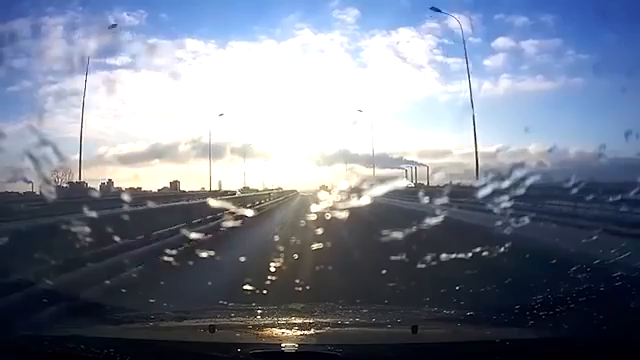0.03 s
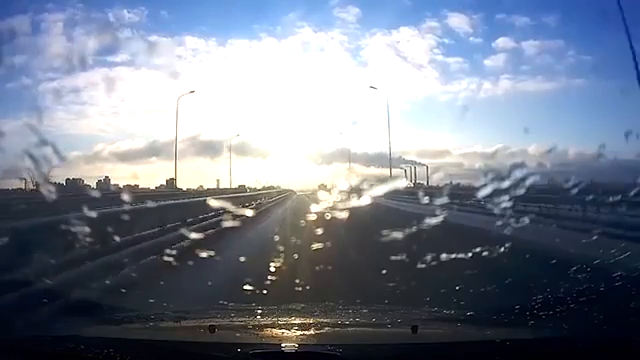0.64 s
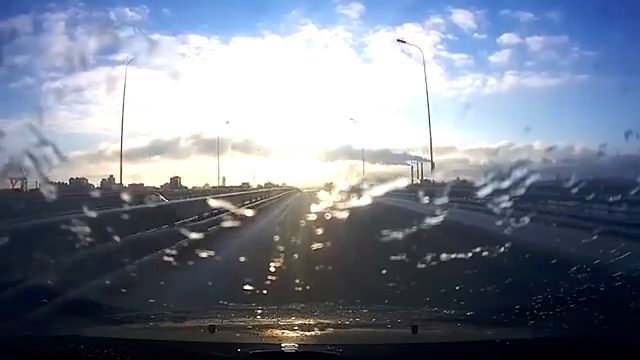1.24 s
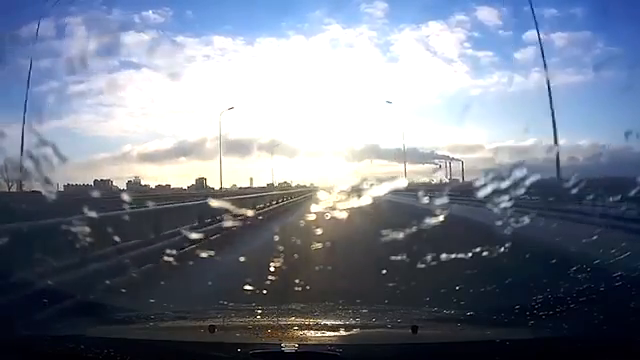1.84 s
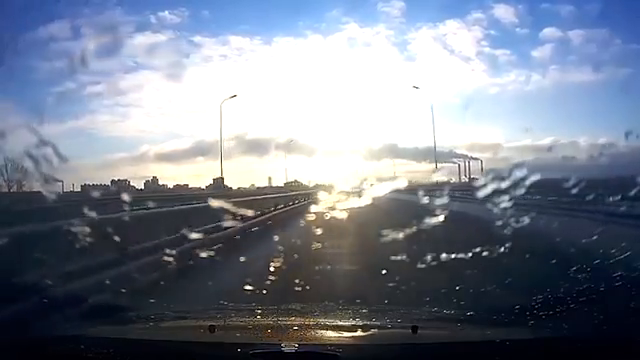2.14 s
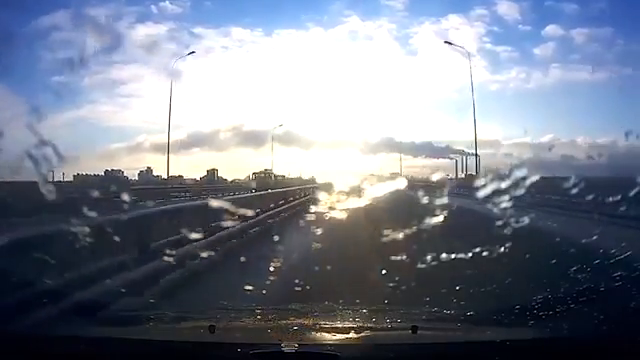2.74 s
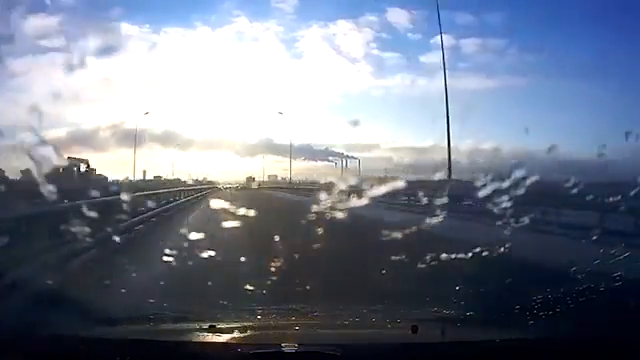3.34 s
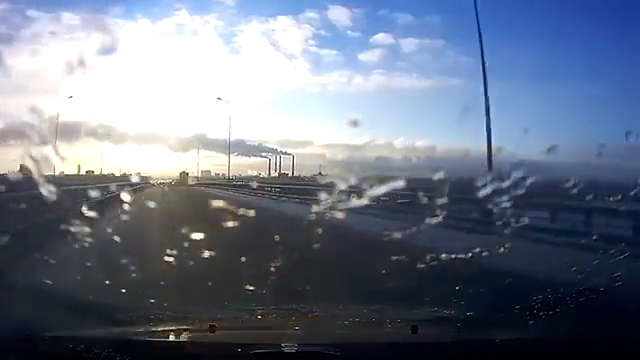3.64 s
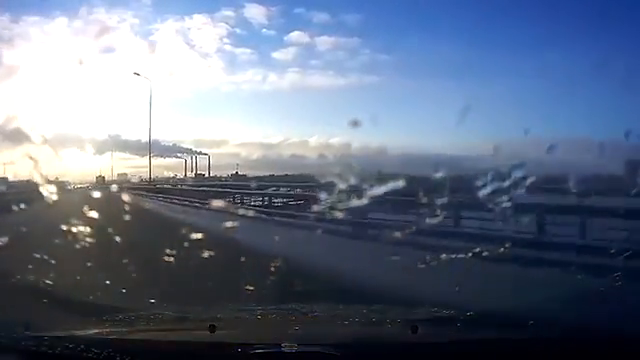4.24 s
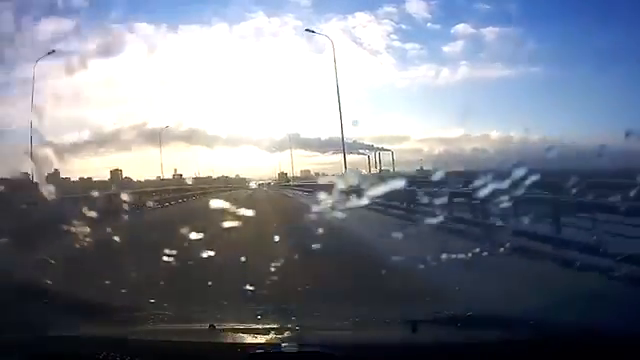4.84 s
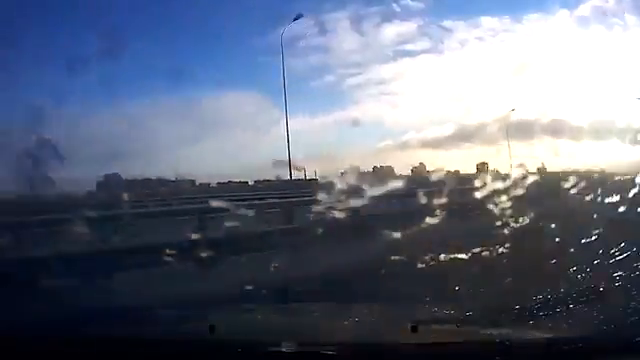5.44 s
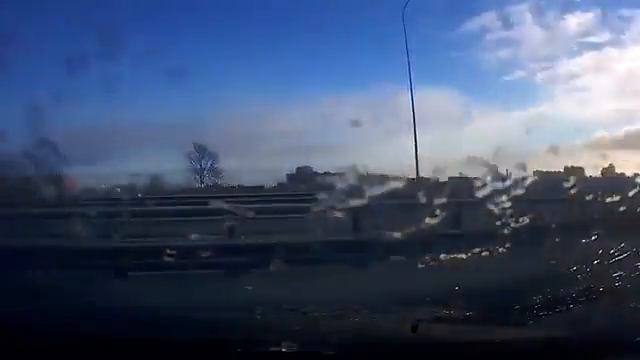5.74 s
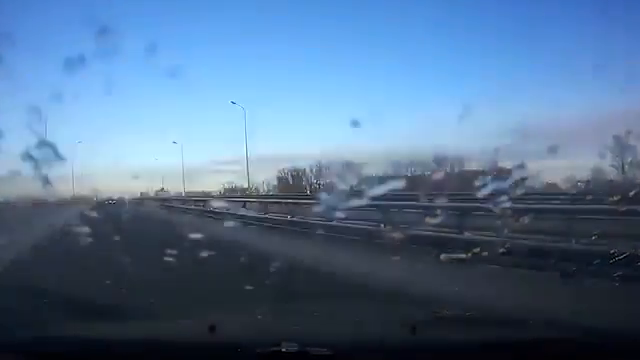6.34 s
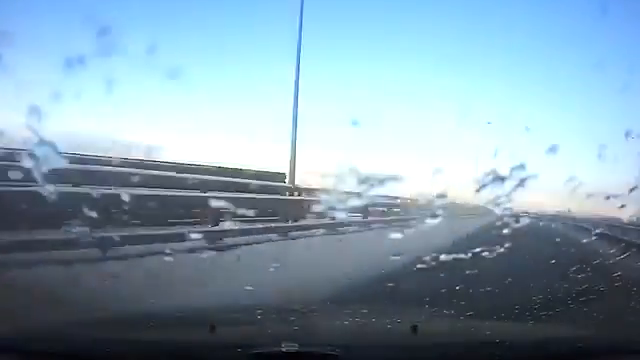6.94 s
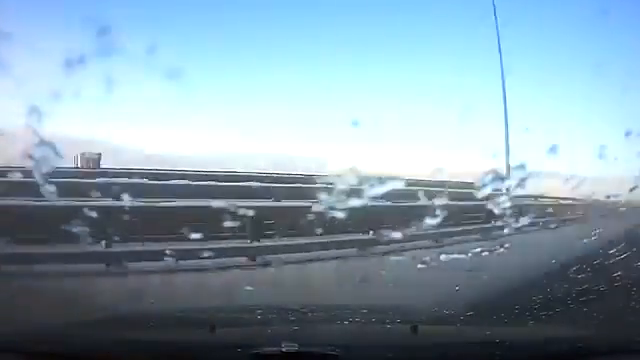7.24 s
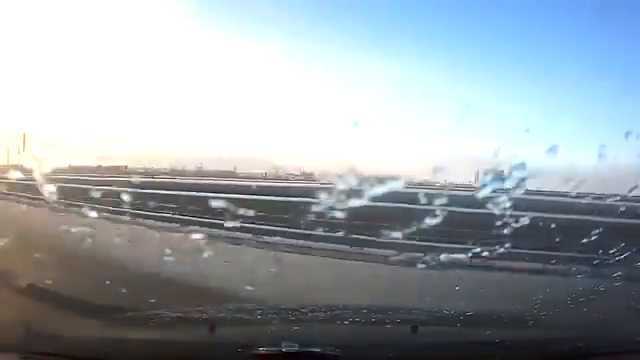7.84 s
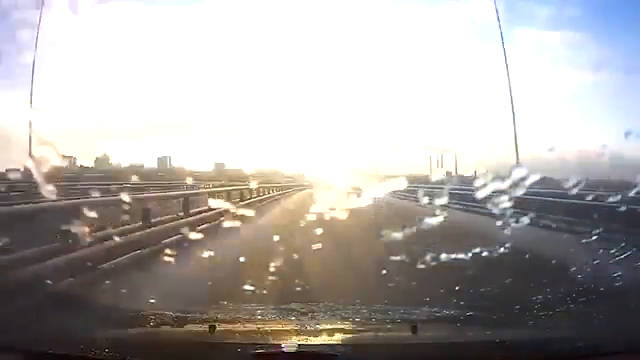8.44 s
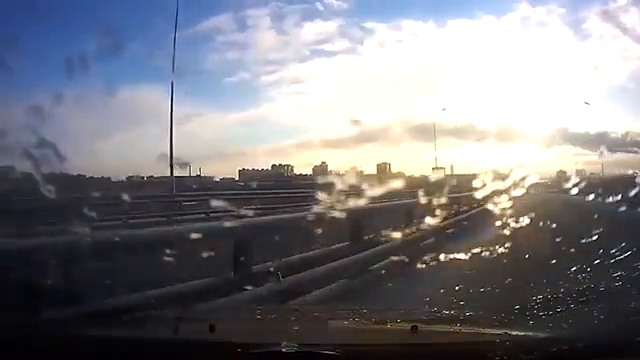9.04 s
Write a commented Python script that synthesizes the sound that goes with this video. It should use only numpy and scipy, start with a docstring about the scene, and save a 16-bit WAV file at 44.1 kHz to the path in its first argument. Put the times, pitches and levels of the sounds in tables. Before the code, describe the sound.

A small microphone at a car's windscreen picks up a throbbing low cabin boom, tyre roar and engine hum. Around 2 seconds the tyres lose grip on slush; the hum dips, returns briefly and is gone by 3.5. The rumble grows heavier and uneven, with plastic trim ticking, and a hard thud and clatter lands at 3.4. The tyres scrub sideways with small chirps from 4 to 4.6. A cluster of heavy knocks, jolts and splashing slush follows between 4.8 and 6, with a low growl near 5.8. A hoarse tyre howl swells to its loudest around 6.4. More thuds, sharp rattles and hissing spray come from 7 to 7.5, then another skid peaks near 7.9 with short squeals. A strong thud hits at 8.6, and lighter knocks follow until about 9. The boom overloads the microphone on big bumps, chopping the other sounds.

```python
"""Inside a car spinning on a wet, slushy winter road, heard from a small microphone at the windscreen.
Close all round, the cabin air booms over the tyre roar, and the engine hum fades as grip is lost.
Beyond the floor the tyres scrub sideways, growl, chirp and throw slush at the wheel arches.
Bumps knock the body and rattle the trim; the boom overloads the microphone and chops everything else."""
import sys
import numpy as np
from scipy import signal
from scipy.fft import rfft, irfft, next_fast_len
from scipy.io import wavfile
from scipy.ndimage import map_coordinates

SR = 44100
rng = np.random.default_rng(int(sys.argv[2]) if len(sys.argv) > 2 else 0)


def wrap_up_sound(samples):
    """Save the sound to the file named by the first command line argument, as 16-bit audio."""
    columns = np.atleast_2d(samples).T
    # keep every value between -1 and 1, then stretch to whole-number steps
    tamed = np.clip(columns, -1, 1)
    steps = np.round(tamed * 32767).astype(np.int16)
    wavfile.write(sys.argv[1], SR, steps)


N = 400428
TIME = np.arange(N) / SR

# resonances of the body panels: pitch_hz, width_hz, level_db
PANEL_MODES = [(264, 92, 4.5), (453, 129, 5.5), (641, 71, 6.5), (894, 164, 1.5), (1176, 286, -4),
               (1843, 224, -10.5), (2655, 220, -13), (4230, 1300, -23), (4870, 2400, -27)]
# resonances of the plastic trim: pitch_hz, width_hz, level_db
TRIM_MODES = [(1343, 59, 14.5), (2120, 170, 3.5), (2800, 300, 1.5), (4220, 6800, -2.5), (6140, 1200, -1.5)]


def from_db(db):
    """Decibels to gain."""
    return 10 ** (np.asarray(db) / 20)


def rms_one(x):
    """Scale to unit power."""
    return x / np.sqrt(np.mean(x ** 2) + 1e-20)


def in_time(rows, column=1):
    """One column of a curve at every sample."""
    rows = np.array(rows)
    return np.interp(TIME, rows[:, 0], rows[:, column])


def butter(x, order, hz, kind="low"):
    """Butterworth filter."""
    return signal.sosfilt(signal.butter(order, hz, kind, fs=SR, output="sos"), x)


def noise(colour):
    """Noise of a given spectrum, rms 1."""
    hz, db = np.transpose(colour)
    size = next_fast_len(N)
    bins = np.maximum(np.arange(size // 2 + 1) * SR / size, 1)
    gain = from_db(np.interp(np.log(bins), np.log(hz), db, left=-100, right=-100))
    return rms_one(irfft(rfft(rng.standard_normal(size)) * gain, size)[:N])


def drift(rate_hz):
    """Smooth random wander with spread 1."""
    step, settle = 40, 2000
    r = np.exp(-2 * np.pi * step * rate_hz / SR)
    slow = signal.lfilter([1], [1, -2 * r, r * r], rng.standard_normal(N // step + settle + 2))[settle:]
    return np.interp(np.arange(N) / step, np.arange(len(slow)), rms_one(slow))


def waver(x, share, rate_hz):
    """Let the pitch of a sound wander by a small share."""
    speed = drift(rate_hz)
    position = np.arange(N) + share * np.cumsum(speed - speed.mean())
    return map_coordinates(x, [position], order=1, mode="mirror")


def resonate(x, modes):
    """Parallel resonances; white noise roughly keeps its power."""
    out, power = 0, 0
    for k, (hz, width, db) in enumerate(modes):
        r = np.exp(-np.pi * width / SR)
        poles = [1, -2 * r * np.cos(2 * np.pi * hz / SR), r * r]
        ring = (1 - r * r) / 2 * signal.lfilter([1, 0, -1], poles, x + 1e-18)
        out = out + (-1) ** k * from_db(db) * ring
        power += from_db(db) ** 2 * np.pi * width / SR
    return out / np.sqrt(power)


def blow(start_s, decay_s, rise_s=0.0002, hz=None):
    """A fast rise, then an exponential fall; it rings if it is given a pitch."""
    age, out = TIME[:SR // 2], np.zeros(N + SR)
    shape = np.exp(-age / decay_s) * (1 - np.exp(-age / rise_s))
    at = int(start_s * SR)
    out[at:at + len(age)] = shape if hz is None else shape * np.sin(2 * np.pi * hz * age)
    return out[:N]


def patter(modes, grains_per_s):
    """Grains strike a resonant surface at random, rms 1."""
    grains = (rng.random(N) < grains_per_s / SR) * rng.standard_normal(N)
    return rms_one(resonate(grains, modes))


def swells(rows, drop_db=8):
    """Gain of rounded swells, each drop_db down one build-up before and one release after its peak."""
    power = 0
    for peak_s, db, build_s, release_s in rows:
        away = np.minimum(np.abs(TIME - peak_s) / np.where(TIME < peak_s, build_s, release_s), 10)
        power = power + from_db(db - drop_db * away ** 2) ** 2
    return np.sqrt(power)


def flatten(x, top, knee):
    """Soft limit: clean for small swings, flat at the top."""
    return x / (1 + np.abs(x / top) ** knee) ** (1 / knee)


def grip_lost(start_s=1.924, fade_s=0.59):
    """0 while the tyres hold, 1 once they have let go."""
    return np.clip((TIME - start_s) / fade_s, 0, 1)


def shaking(smooth_boom_db=-20.5, smooth_judder_db=-35, attack_s=0.046, release_s=0.073):
    """Gains of boom and judder: each rutted stretch raises both quickly, holds them and lets go."""
    # stretches of rutted slush: start_s, length_s, boom_db, judder_db
    ruts = [(2.487, 0.35, -15, -41), (2.942, 0.12, -16, -42), (3.25, 0.22, -15.5, -43),
            (3.593, 0.16, -22.5, -37), (3.868, 0.54, -13, -31), (4.465, 0.31, -10, -31),
            (5.135, 0.23, -8, -27), (5.515, 0.44, -18, -21.5), (5.93, 0.12, -14, -22.5),
            (6.316, 0.16, -20, -44), (6.782, 0.66, -14, -55), (7.152, 0.27, -12.5, -30.5),
            (7.6, 0.13, -21.5, -33.5), (7.854, 0.02, -14.5, -32), (8.057, 0.21, -16, -53),
            (8.529, 0.036, -8.5, -35)]
    boom_power = from_db(smooth_boom_db) ** 2
    judder_power = (from_db(smooth_judder_db) * grip_lost()) ** 2
    for start_s, length_s, boom_db, judder_db in ruts:
        inside = np.interp(TIME - start_s, [-attack_s, 0, length_s, length_s + release_s], [0, 1, 1, 0])
        boom_power = boom_power + (from_db(boom_db) * inside) ** 2
        judder_power = judder_power + (from_db(judder_db) * inside) ** 2
    return np.sqrt(boom_power), np.sqrt(judder_power)


def cabin_boom(gain, wander_hz, skid_wander_hz, boom_db, sway_db):
    """The road shakes the air around the microphone: a throbbing boom over a broader sway of the body."""
    # the boom sinks as the wheels slow: time_s, pitch_hz
    boom_pitch = [(0, 45), (2.2, 47), (3.5, 36), (4.4, 40), (6.2, 39), (7.2, 34), (9.08, 35)]
    # spectrum of the body sway: frequency_hz, level_db
    sway_colour = [(10, -11), (22, 5.5), (32, -10), (50, 2), (65, -12), (110, -17.5), (300, -70.5)]
    pitch_hz = in_time(boom_pitch) + (wander_hz + skid_wander_hz * grip_lost()) * drift(8.88)
    throb = from_db(2.4 * (1 - grip_lost() / 2) * drift(4.6))
    boom = np.sqrt(2) * np.sin(2 * np.pi * np.cumsum(pitch_hz) / SR) * throb
    air = from_db(boom_db) * boom + from_db(sway_db) * noise(sway_colour)
    return flatten(gain * air, top=0.31, knee=3.5)


def engine(octave_db):
    """Up front, the firing order and its faint octave hum until the throttle is released."""
    # engine hum: time_s, firing_hz, level_db
    running = [(0, 90.7, -26), (1.2, 92.3, -25.5), (1.38, 94.1, -28), (1.55, 93.9, -25), (2.09, 96.8, -25),
               (2.15, 95.2, -38), (2.55, 87.1, -37.5), (3.2, 89.1, -27), (3.6, 84, -67)]
    phase = 2 * np.pi * np.cumsum(in_time(running)) / SR
    hum = np.sqrt(2) * (np.sin(phase) + from_db(octave_db) * np.sin(2 * phase))
    return hum * from_db(in_time(running, column=2))


def rolling(judder_gain, road_db, slowed_db, ring_db, judder_db, lumpy_db):
    """Through the floor: tyre roar that sinks with speed, and lumpy judder on the ridges."""
    # spectrum of the road roar: frequency_hz, level_db
    road_colour = [(60, -10), (120, -12), (190, -18), (312, -15.5), (430, -22), (720, -23), (810, -28),
                   (950, -26), (1210, -27), (1570, -40), (2550, -44.5), (3260, -61.5), (5500, -62),
                   (7000, -78.5)]
    # faint rings of the rolling tyres: pitch_hz, width_hz, level_db
    tyre_modes = [(358, 42, -7.5), (538, 3.9, -3.5), (716.6, 30, -3.5), (937, 60, -7), (2600, 55, -20)]
    # spectrum of the wheel judder: frequency_hz, level_db
    judder_colour = [(45, -6), (70, 10), (140, -3.5), (220, -5.5), (380, -9.5), (520, -5.5), (750, -33),
                     (1500, -27.5), (7000, -53.5)]
    slowing = np.clip((TIME - 2) / 2, 0, 1)
    roar = noise(road_colour) + from_db(ring_db) * resonate(rng.standard_normal(N), tyre_modes)
    judder = judder_gain * from_db(judder_db + lumpy_db * drift(22)) * noise(judder_colour)
    return from_db(road_db + slowed_db * slowing) * roar + judder


def wetness(rise_s=0.048, fall_s=0.046):
    """Gain of the spray: the slush on the road, plus a short surge at each puddle."""
    # spray from the wheels, thickest beside the barriers: time_s, level_db
    spray_level = [(1.7, -69), (2.4, -57), (2.8, -56), (3.28, -45.5), (3.57, -55.5), (4.35, -53.5),
                   (4.85, -47), (5.35, -35), (5.55, -44), (6.15, -55), (6.75, -58.5), (7.3, -33.5),
                   (7.7, -45.5), (8.03, -58), (8.6, -43.5), (8.9, -51), (9.08, -43.5)]
    # a wheel hits a puddle: peak_s, level_db
    splashes = [(1.87, -55), (2.5, -47), (3.489, -50), (3.73, -47.5), (3.912, -47), (4.14, -40.5),
                (4.53, -44), (4.961, -53), (5.211, -31.5), (5.75, -35), (6.84, -48.5), (6.969, -64),
                (7.22, -31), (7.42, -28), (7.849, -44), (8.16, -54), (8.51, -40.5), (9.0, -48)]
    power = from_db(in_time(spray_level)) ** 2
    for peak_s, db in splashes:
        away = np.minimum(np.abs(TIME - peak_s) / np.where(TIME < peak_s, rise_s, fall_s), 20)
        power = power + (from_db(db) * np.exp(-away)) ** 2
    return np.sqrt(power)


def slush(hiss_db, grains_db, flutter_db):
    """A hiss of spray with single grains pattering on the wheel arches."""
    # spectrum of the spray: frequency_hz, level_db
    spray_colour = [(400, -15.5), (1200, -6.5), (2000, 2), (2750, 2.5), (3300, -5), (4600, -5),
                    (5500, -0.5), (6200, -5), (7000, -10), (9000, -11), (15000, -14.5)]
    grains = from_db(grains_db) * patter(TRIM_MODES, grains_per_s=230)
    hiss = from_db(hiss_db) * noise(spray_colour)
    return wetness() * from_db(flutter_db * drift(30)) * (hiss + grains)


def scrubbing(creep_db=-48.5):
    """Gain of the scrub: a light creep once grip is lost, and a swell at every swing."""
    # the car swings sideways: widest_s, level_db, build_s, release_s
    swings = [(3.1, -40.5, .12, 0.2), (4.15, -32, 0.36, 0.38), (4.55, -31.5, 0.29, 0.27),
              (6.38, -22.5, 1.0, 0.35), (7.92, -24, 0.69, 0.33), (8.47, -31, 0.34, 0.22),
              (9.06, -40, 0.14, .2)]
    return np.hypot(from_db(creep_db) * grip_lost(), swells(swings))


def skid(howl_db, scrub_db, rasp_db, flutter_db, focus_db_per_octave):
    """Tread blocks stick and slip: a hoarse howl, a broad scrub and a rasp that pulses with the howl."""
    # stick-slip rate, highest when the car is broadside: time_s, rate_hz
    slip_rate = [(2.3, 835), (4.2, 765), (4.45, 750), (4.62, 910), (5.2, 970), (5.7, 555), (6, 612),
                 (6.3, 1026), (6.65, 705), (7, 1040), (7.4, 800), (7.9, 1000), (8.2, 960), (8.42, 691),
                 (8.6, 733), (9.08, 987)]
    # resonances of the sliding tread: pitch_hz, width_hz, level_db
    tread_modes = [(353, 160, -5), (495, 42, -2), (691, 56, 4), (780, 82, -13.5), (924, 48, 3),
                   (1029, 64, -3.5), (1117, 39, -2)]
    # spectrum of the scrub: frequency_hz, level_db
    scrub_colour = [(250, -0.5), (500, -0.5), (900, 2), (1250, -0.5), (1550, -15.5), (2000, -20),
                    (2400, -22), (2750, -23), (3300, -35), (7000, -53)]
    # thin ring of the scrubbing tread: pitch_hz, width_hz, level_db
    rasp_modes = [(1780, 420, -9.5), (2490, 90, 0.5), (2820, 110, 4)]
    slip_hz, howl, power = in_time(slip_rate), 0, 0
    for hz, width, db in tread_modes:
        # resonances nearest the slip rate are driven hardest
        gain = from_db(db - focus_db_per_octave * np.abs(np.log2(hz / slip_hz)))
        ring = resonate(rng.standard_normal(N), [(hz, width, 0)])
        howl = howl + gain * waver(ring, share=0.014, rate_hz=6.97)
        power = power + gain ** 2
    howl = butter(howl / np.sqrt(power), 3, 1450)
    rasp = resonate(howl * noise(scrub_colour), rasp_modes)
    rasp = rms_one(butter(rasp, 3, [1800, 3000], "band"))
    flutter = from_db(flutter_db * drift(55))
    slide = from_db(howl_db) * howl + from_db(scrub_db) * noise(scrub_colour) + from_db(rasp_db) * rasp
    return scrubbing() * flutter * slide


def road_grit(grit_db):
    """Grit crunches under the sliding tread and rings the higher panel resonances."""
    return scrubbing() * from_db(grit_db) * patter(PANEL_MODES[2:], grains_per_s=900)


def ticks(force_db, ring_width_hz, ring_db, trim_db):
    """Bright contacts on plastic close by: the loose part rings at its own pitch, the trim with it."""
    # ticks and crunches of loose trim and grit: start_s, level_db, decay_s, pitch_hz
    rattles = [(2.49, -38, .013, 5330), (2.868, -35, .005, 4600), (3.168, -32, .0099, 2400),
               (3.417, -26, 0.032, 2700), (3.48, -33, 0.017, 5560), (3.894, -27, 0.0035, 5240),
               (3.93, -35.5, .0082, 5250), (4.127, -31, 0.0098, 4000), (4.506, -36, .006, 5200),
               (4.82, -36, .0035, 5500), (5.117, -26.5, 0.014, 5500), (5.179, -25, 0.0052, 5660),
               (5.208, -25, 0.017, 2600), (5.357, -27, .0087, 3700), (5.439, -22, 0.015, 5600),
               (5.735, -32, 0.015, 5500), (5.821, -23, 0.012, 2500), (6.153, -30, 0.0014, 5150),
               (6.336, -35, 0.0034, 4900), (6.409, -39, .0044, 5170), (6.46, -45, 0.0017, 5900),
               (6.486, -36, .0095, 4970), (6.582, -35, 0.0036, 5040), (6.759, -40, .004, 5400),
               (6.82, -34, 0.014, 5160), (6.948, -27.5, 0.0039, 2700), (7.112, -20.5, 0.011, 5400),
               (7.191, -15.5, .007, 2400), (7.227, -29, 0.013, 2700), (7.454, -26.5, .012, 2650),
               (7.858, -44, .005, 5000), (8.513, -29, 0.01, 1950), (8.62, -27, 0.008, 2700),
               (8.749, -20, 0.0065, 4540), (9.066, -39, .02, 2650)]
    out, contacts = np.zeros(N), rng.standard_normal(N)
    for start_s, db, decay_s, hz in rattles:
        span = slice(int(start_s * SR), int(start_s * SR) + SR // 2)
        force = from_db(db + force_db) * blow(start_s, decay_s)[span] * contacts[span]
        out[span] += from_db(trim_db) * resonate(force, TRIM_MODES)
        out[span] += from_db(ring_db) * resonate(force, [(hz, ring_width_hz, 0)])
    return out


def jolts(rise_s):
    """A jolt swings the cabin air for a few cycles, far past what the microphone can follow."""
    # heavy jolts of the suspension: start_s, level_db, pitch_hz, decay_s
    bumps = [(2.771, -7, 27.1, 0.099), (3.429, 0, 33.9, 0.077), (4.775, -2.5, 41.16, 0.12),
             (5.232, -3, 33.05, 0.09), (5.487, -6.5, 35.5, .045), (5.838, 1, 38.3, 0.07),
             (5.991, -4.5, 30.3, 0.04), (7.031, 0.5, 34.12, 0.11), (7.285, 0, 36.6, 0.048),
             (7.44, -1.5, 35, 0.071), (7.853, 2.5, 32.7, .022), (8.253, -5, 33.1, 0.093),
             (8.68, -2.5, 34.5, 0.051)]
    return sum(from_db(db) * blow(start_s, decay_s, rise_s, hz) for start_s, db, hz, decay_s in bumps)


def knocks(thud_decay_s, clatter_gain_db, rattle_db, panel_spread):
    """Each blow on the body rings one large panel and sets off a short clatter of contacts."""
    # blows on the body: start_s, thud_db, thud_hz, clatter_db, clatter_decay_s
    hits = [(3.084, -25, 196, -25, 0.023), (3.412, -5.5, 265.3, -7, 0.0096), (3.418, -15, 589, -24, 0.0089),
            (3.427, -22, 192, -18, 0.014), (3.459, -17.5, 697, -3, 0.0024), (3.472, -19, 318, -14, 0.0093),
            (4.125, -18.5, 338, -22.5, 0.013), (4.133, -28.5, 190, -24, 0.014),
            (4.699, -30, 327, -13.5, 0.009), (4.938, -17.5, 129, -21, 0.02),
            (4.966, -5.5, 73.4, -38, 0.011), (5.107, -44, 284, -17, 0.032),
            (5.201, -7.5, 111, -4.5, 0.0081), (5.211, -19.5, 295, -17, 0.0082),
            (5.353, -0.5, 139.7, -7.5, 0.0081), (5.363, -12, 285.5, -4.5, 0.0064),
            (5.383, -5, 157, -19, 0.036), (5.437, -6.5, 109, -15, 0.026), (5.446, -19.5, 247.5, -25, 0.019),
            (5.814, -15, 198, -10.5, 0.039), (6.008, -24, 330, -29, .02), (6.958, -30, 148, -19.5, 0.017),
            (7.073, -20, 113, -14, 0.009), (7.113, -33, 132, -16, 0.048), (7.14, -27, 606, -20, 0.0067),
            (7.192, -12, 548, -9, 0.012), (7.266, -21, 404, -14.5, 0.0094), (7.4, -11, 137.5, -15.5, 0.029),
            (7.439, -7, 191, -9.5, 0.012), (7.464, -15, 132, -21, 0.0099), (7.888, -22, 248, -17, 0.014),
            (7.946, -26, 270, -26, 0.012), (8.617, 1, 117.6, -3.5, 0.0076), (8.63, -15, 216, -22, 0.012),
            (8.662, -6.5, 99.4, -17.5, 0.02), (8.8, -27.5, 506, -22.5, 0.014),
            (8.832, -20.5, 312, -40, 0.0085), (9.019, -24, 308, -20.5, 0.0073)]
    out = np.zeros(N)
    contacts = rms_one(rng.standard_normal(N) * from_db(rattle_db * drift(260)))
    for start_s, thud_db, thud_hz, clatter_db, clatter_decay_s in hits:
        span = slice(int(start_s * SR), int(start_s * SR) + SR // 2)
        # each lands elsewhere and rings a little differently
        detuning = 1 + panel_spread * rng.standard_normal(len(PANEL_MODES))
        panels = [(hz * shift, width, db) for (hz, width, db), shift in zip(PANEL_MODES, detuning)]
        thud = blow(start_s, thud_decay_s, rise_s=0.0021, hz=thud_hz)[span]
        clatter = resonate(blow(start_s, clatter_decay_s)[span] * contacts[span], panels)
        out[span] += from_db(thud_db) * thud + from_db(clatter_db + clatter_gain_db) * clatter
    return out


def plough(lumpy_db):
    """Slush heaps up against the sidewalls and breaks away in lumps, growling."""
    # the tyres push sideways into heaped slush: deepest_s, level_db, build_s, release_s
    heaps = [(3.19, -35.5, 0.027, 0.052), (4.65, -39, 0.17, 0.083), (5.8, -22, 0.16, 0.31),
             (7.3, -27, 0.14, 0.26), (7.92, -34.5, 0.27, 0.14)]
    # spectrum of the growl: frequency_hz, level_db
    growl_colour = [(110, -22.5), (200, -4.5), (350, 0.5), (500, -8), (700, -10.5), (1500, -35)]
    return swells(heaps) * from_db(lumpy_db * drift(51)) * noise(growl_colour)


def chirps(waver_hz):
    """Short wavering squeals as the tyres start to bite again."""
    # the tread briefly catches: peak_s, pitch_hz, level_db, half_length_s
    catches = [(4.235, 720, -37, .012), (4.322, 746, -32.5, 0.014), (4.44, 744, -35.5, 0.037),
               (4.577, 860, -35, 0.02), (7.372, 720, -21.5, 0.013), (7.828, 1040, -29, 0.014),
               (7.95, 1000, -24, .015), (8.421, 728, -25.5, 0.017), (8.492, 773, -33, 0.018),
               (8.936, 930, -39, 0.019)]
    out, bend_hz = np.zeros(N), waver_hz * drift(40)
    for peak_s, hz, db, half_length_s in catches:
        envelope = np.exp(-np.minimum(((TIME - peak_s) / half_length_s) ** 2 / 2, 20))
        squeal = np.sqrt(2) * np.sin(2 * np.pi * np.cumsum(hz + bend_hz) / SR)
        out += from_db(db) * envelope * squeal
    return out


def scene():
    """Everything as it reaches the windscreen, in mono."""
    boom_gain, judder_gain = shaking()
    cabin = cabin_boom(boom_gain, wander_hz=1.708, skid_wander_hz=2.014, boom_db=-2.55, sway_db=-3)
    cabin += jolts(rise_s=0.0037) + engine(octave_db=-21.5)
    tyres = rolling(judder_gain, road_db=-31, slowed_db=-2.5, ring_db=-12, judder_db=-1, lumpy_db=3.5)
    tyres += skid(howl_db=-0.93, scrub_db=-5, rasp_db=-22, flutter_db=1, focus_db_per_octave=6)
    tyres += road_grit(grit_db=-14) + plough(lumpy_db=1) + chirps(waver_hz=22.86)
    spray = slush(hiss_db=-2.5, grains_db=-4, flutter_db=1)
    body = knocks(thud_decay_s=0.02, clatter_gain_db=0.5, rattle_db=2.5, panel_spread=0.05)
    trim = ticks(force_db=3.5, ring_width_hz=530, ring_db=-10, trim_db=-2.5)
    return (cabin + tyres + spray + body + trim)[None]


def record(dry, overload=0.295, cutoff_hz=7000, skirt_db=-19, fizz_db=-21):
    """Loud swings are flattened, the treble is cut at 7 kHz; a faint high fizz rides on the peaks."""
    flat = flatten(dry, overload, knee=12)
    excess = dry - flat
    hiss = flatten(butter(excess, 2, 600, "high"), top=0.09, knee=2)
    clipped = flat + 0.2 * hiss  # a little hiss survives on the flattened swings
    narrow = signal.sosfilt(signal.ellip(10, 0.2, 70, cutoff_hz, fs=SR, output="sos"), clipped)
    skirt = butter(clipped, 2, [6900, 7700], "band")
    fizz = flatten(butter(excess, 8, 8500, "high"), top=0.01, knee=2)
    crackling = flatten(narrow + from_db(skirt_db) * skirt, overload * 1.12, knee=24)
    return butter(crackling + from_db(fizz_db) * fizz, 10, 15000)


dry = scene()
out = record(dry)
wrap_up_sound(out)
```